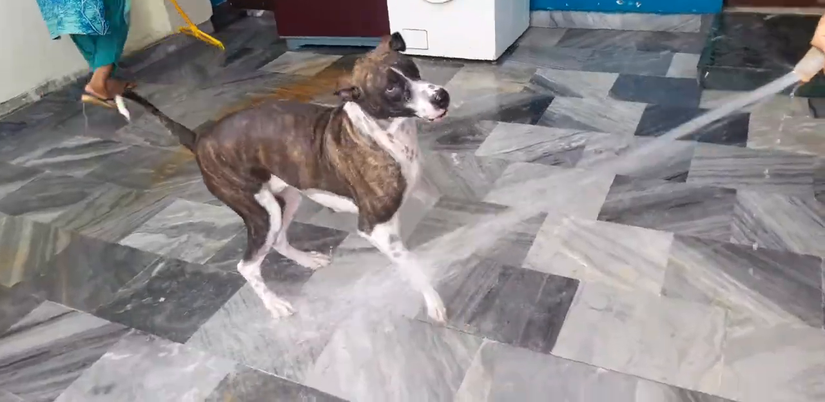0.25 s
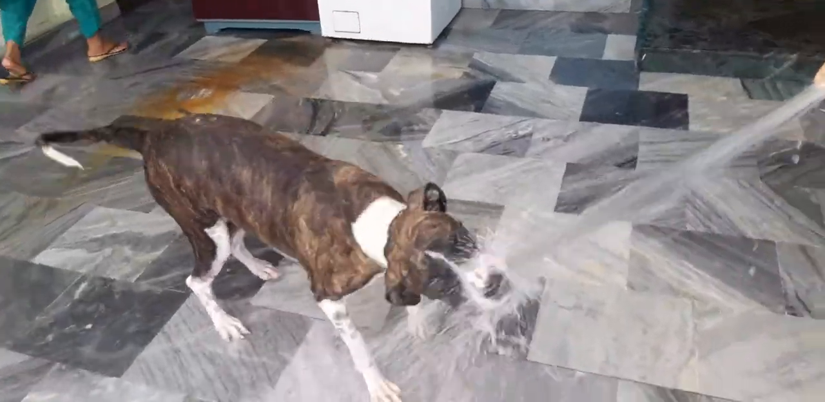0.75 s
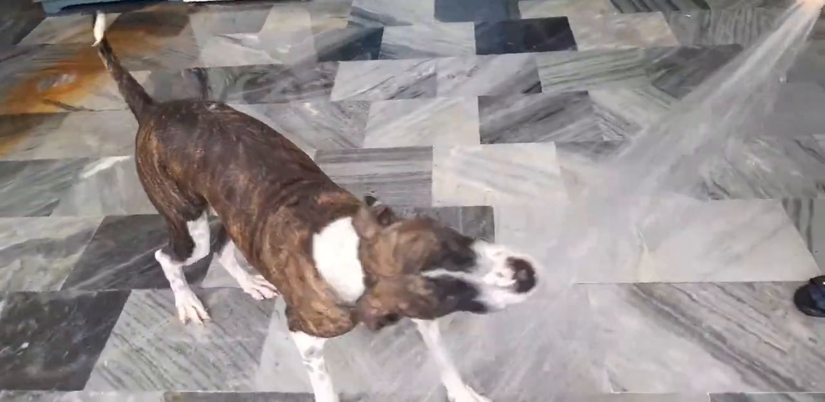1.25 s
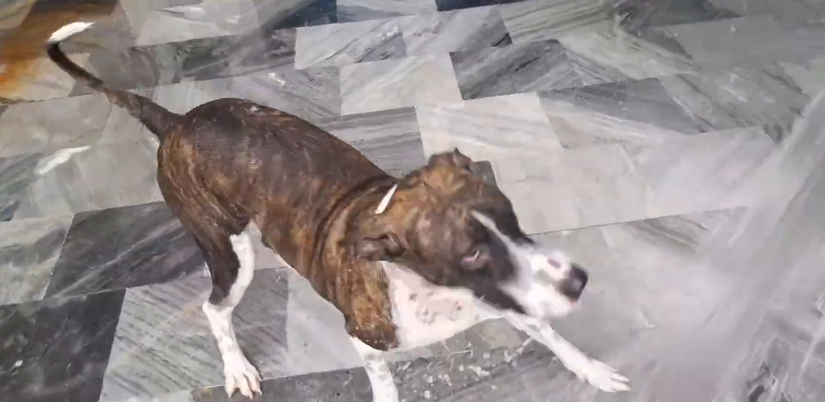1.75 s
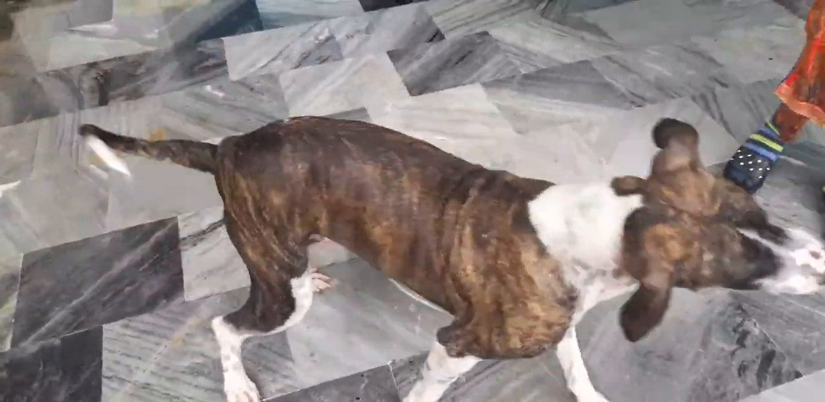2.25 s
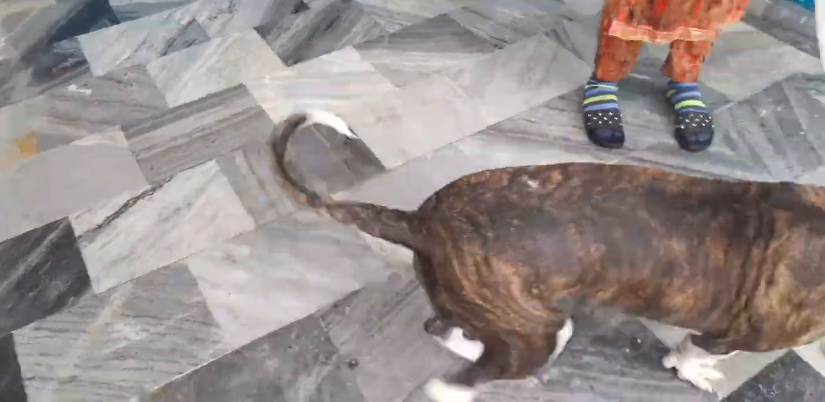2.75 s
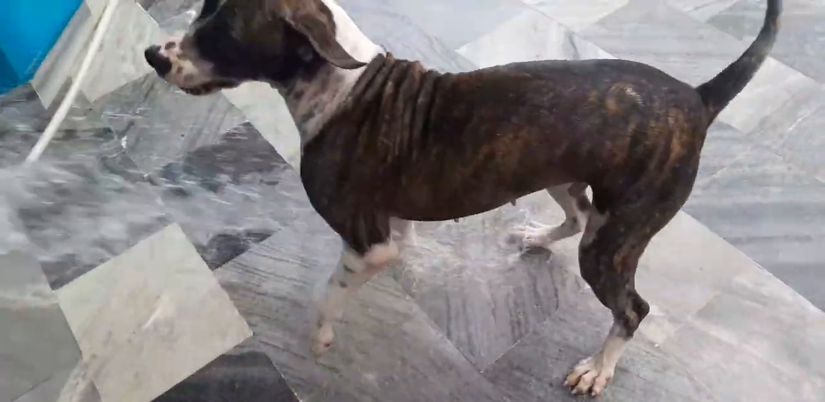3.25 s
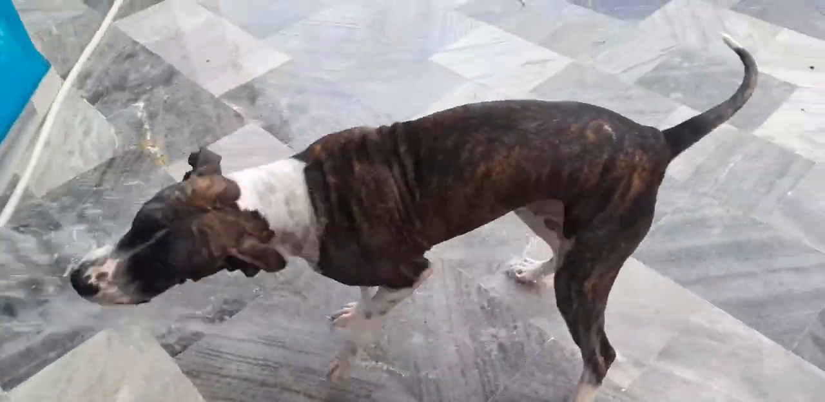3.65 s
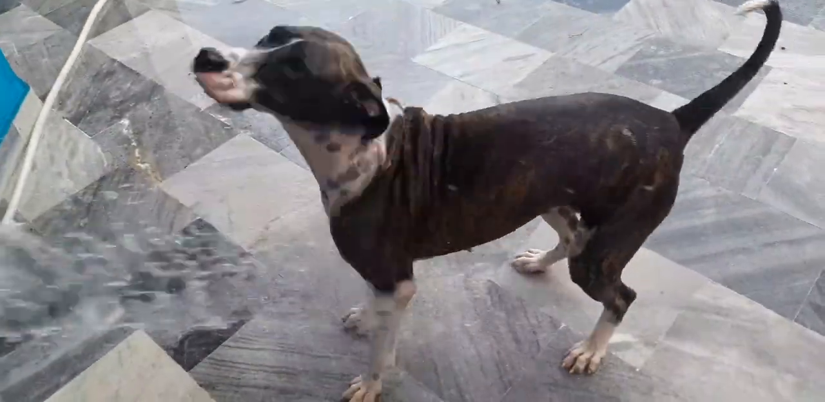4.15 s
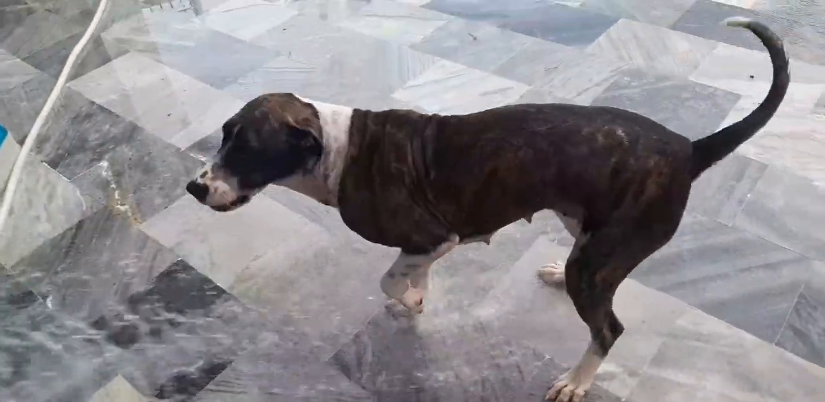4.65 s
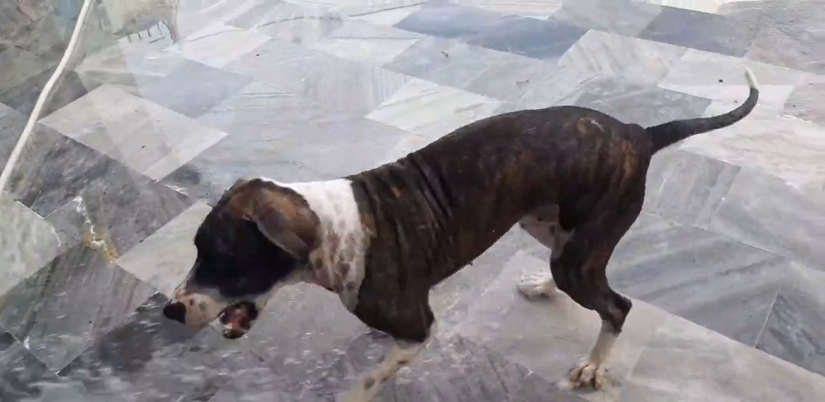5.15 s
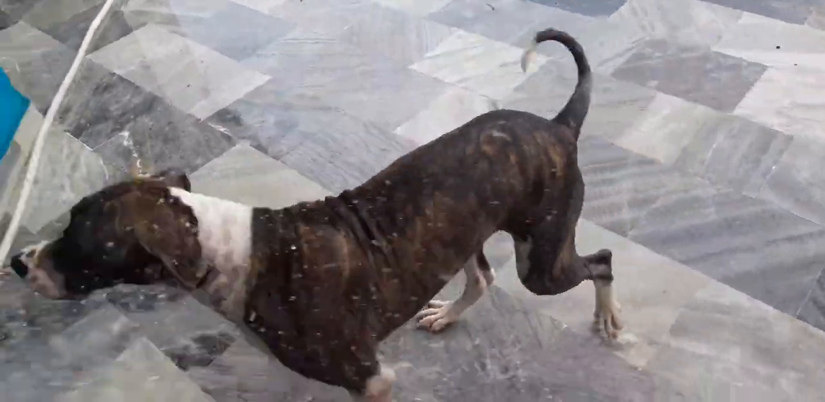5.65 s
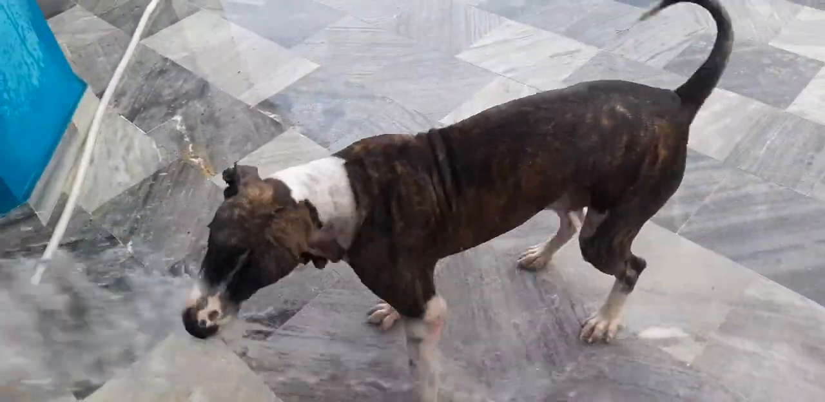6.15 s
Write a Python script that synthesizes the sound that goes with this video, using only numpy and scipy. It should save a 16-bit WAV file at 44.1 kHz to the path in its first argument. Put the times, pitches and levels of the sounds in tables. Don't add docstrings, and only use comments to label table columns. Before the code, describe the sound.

A hose jet patters and hisses densely on wet tiles while a dog splashes and snaps at the water, with one brief rubber squeak.

```python
import sys
import numpy as np
from scipy import signal
from scipy.fft import rfft, irfft, next_fast_len
from scipy.io import wavfile

SR = 44100
rng = np.random.default_rng(int(sys.argv[2]) if len(sys.argv) > 2 else 0)


def int16_out(signal):
    q = np.round(np.clip(np.atleast_2d(signal).T, -1, 1) * 32767)
    wavfile.write(sys.argv[1], SR, q.astype(np.int16))


def natural_amplitude(level_db):
    exponent = np.asarray(level_db, float) / 20
    return 10 ** exponent


N = 282769

# time in seconds, drop patter in dB, strength of the mist in dB.
JET = [(0.0, -30, -3), (0.12, -24.5, -4), (0.41, -21, -4.5), (0.8, -23, -4.5), (0.89, -30.5, -1.5),
       (1.02, -27.5, -5), (1.39, -27.5, -4.5), (1.48, -29, -4), (1.75, -28, -7), (2.0, -21.5, -8.5),
       (2.48, -22, -8.5), (2.59, -21.5, -6.5), (2.75, -24, -8), (3.1, -24.5, -7.5), (3.98, -25, -6.5),
       (5.39, -23, -7.5), (5.69, -25, -6), (6.41, -23.5, -7.5)]
# pitch in Hz, level in dB per Hz.
PATTER_COLOUR = [(530, -27), (900, -17), (1400, -17), (2180, -15), (3950, -7), (6220, -5), (8090, 1),
                 (8690, -0.5), (10300, -14), (11900, -6.5), (14000, -8.5), (15600, -10.5)]
ZONES_HZ = [1800, 3700, 7000, 12500]
# start in seconds, length in seconds, change of patter in dB,
# gain of heavy slaps in dB.
CROSSINGS = [(-.03, 0.16, 0.5, 3.5), (0.714, .12, 1, 7.5), (0.9, 0.066, -2, 3), (1.297, 0.18, 0.5, 4.5),
             (1.47, .07, -3, 5.5), (1.643, 0.086, -1, -1), (1.148, .1, -0.8, -2.5), (1.725, 0.038, 2.5, 1),
             (1.964, 0.12, -0.5, -1.5), (0.823, .07, -1, 3.5), (2.93, 0.088, -0.5, 4), (3.27, .08, 1.5, -1),
             (3.97, 0.072, 0.5, 3), (4.134, 0.11, -1.5, -2.5), (4.74, 0.28, 0.9, 0),
             (5.676, 0.076, -0.5, -1.5), (5.95, 0.56, 0.5, 2.5), (2.532, 0.11, 1, 7), (2.664, 0.14, 1, 9),
             (2.842, 0.071, 1, 9), (3.615, 0.28, 0.5, 5), (4.25, 0.15, 0.5, 3.5), (4.58, 0.053, 0.5, -4.5),
             (5.38, 0.22, 1, 7.5), (6.1, 0.073, 0, 5), (6.26, 0.047, -2.5, 9)]
# time in seconds, strength in dB,
# eddy size as a tilt toward the bass in dB per octave.
AIR = [(0, -42.5, 2), (.35, -39, 2.5), (.8, -41, -1), (1.05, -47, -1), (1.4, -44.5, -1), (1.75, -49, -3.5),
       (2.05, -37.5, 4), (2.35, -32, 3), (2.65, -35, -2), (3.25, -31.5, -1), (3.55, -33.5, 0.5),
       (4.0, -35, -1), (4.55, -34.5, 1.5), (4.85, -34, -1), (5.15, -34.5, 1), (5.8, -30, -0.5),
       (6.0, -31.5, -1.5), (6.41, -28, -0.5)]
# pitch in Hz, level in dB per Hz.
BUFFET_COLOUR = [(30, -70), (42, -46), (50, -34), (60, -14), (108, -4.5), (134, 0.5), (227, 1), (300, -1),
                 (400, -12.5), (520, -14), (880, -63)]
# pitch in Hz, level in dB per Hz.
RUSH_COLOUR = [(200, -27), (350, 5), (500, 0.5), (700, -3.5), (1000, -6.5), (1400, -14.5), (2500, -30)]
# time in seconds, turns per second in Hz.
ENGINE_TURNS = [(0, 19.0), (1.2, 19.3), (2.1, 19.3), (2.9, 19.0), (5.7, 19.0), (6.41, 18.5)]
# time in seconds, level in dB.
ENGINE_LEVEL = [(0, -51.5), (1.2, -62), (2.9, -45.5), (5.5, -45.5), (5.9, -44.5), (6.41, -40)]
# multiple of the turn rate, level in dB.
ENGINE_ORDERS = [(3, -17), (4, -11), (5, -10), (10, 0), (13, -5), (15, -3), (30, -11)]
# pitch in Hz, level in dB per Hz.
YARD_COLOUR = [(15, -58), (25, -37), (114, 3), (136, 5), (322, -31), (441, 1), (500, -36), (650, -46),
               (1100, -120)]
# time in seconds, level in dB, pitch in Hz, width in Hz.
PAWS = [(0.265, -30.5, 1650, 250), (0.272, -36, 1180, 200), (0.31, -33, 1500, 600),
        (0.891, -39.5, 613, 500), (1.723, -40, 800, 800), (6.288, -24.5, 560, 400), (6.304, -28, 990, 250)]
# time in seconds, peak in dB, pitch in Hz, width as a share of the pitch,
# thrown water in dB.
SNAPS = [(0.6923, -2, 11500, .8, -28), (1.578, -8.5, 7750, 0.35, -35), (1.928, -14, 4960, .8, -39),
         (1.864, -18.5, 2380, 0.53, -32), (2.529, -22.5, 950, .9, -32.5), (3.121, -14, 4000, 1.1, -27),
         (3.408, -30, 1070, .8, -40), (3.7895, -14, 1800, 1.3, -38), (3.9566, -16, 910, .95, -36),
         (4.218, -55, 900, .9, -55), (5.523, -18, 2200, 1.1, -38), (5.539, -26, 2500, 1.05, -33),
         (5.555, -18, 2200, 1.1, -37), (5.877, -26, 696, .8, -42), (6.2873, -17, 750, 1.1, -27)]
# time in seconds, eight times the slip rate in Hz.
SQUEAK_GLIDE = [(0.51, 3400), (0.6, 3425), (0.665, 3410), (0.775, 3465)]
# multiple of the slip rate, level in dB.
SQUEAK_ORDERS = [(6, -20), (7, -12), (8, 0), (9, -13), (10, -20)]
# time in seconds, level in dB.
GRIPS = [(.543, -28), (.567, -28), (.6, -24), (.632, -24), (.652, -31), (.675, -35), (.702, -34),
         (.723, -32), (.748, -38)]
# start in seconds, length in seconds, level in dB, pitch in Hz,
# width in Hz.
SPLASHES = [(0.59, 0.035, -26.5, 3500, 2000), (0.715, 0.065, -40, 1300, 1800),
            (2.533, 0.064, -36, 1400, 1500), (2.838, 0.098, -32, 2000, 2300),
            (5.384, 0.23, -46, 2700, 3200), (5.39, .1, -32, 5300, 770), (2.855, 0.096, -35, 320, 260),
            (5.49, 0.086, -34, 470, 190), (5.76, 0.16, -35, 520, 330), (9.1, 0.071, -37.5, 490, 490),
            (4.84, .06, -42, 540, 400), (0.78, .14, -44.5, 670, 630), (5.3, 0.19, -42, 550, 350),
            (1.3, 0.23, -49, 700, 600), (1.7, 0.039, -39, 510, 440), (3.13, 0.16, -34.5, 410, 240),
            (6.118, .07, -46, 2300, 1400)]
# time in seconds, low edge in Hz, high edge in Hz, level in dB.
PARTINGS = [(1.237, 5200, 7000, -41), (1.449, 4180, 5800, -44), (3.097, 5760, 7650, -39),
            (3.398, 4600, 6300, -40), (3.398, 10200, 11800, -48), (4.257, 11000, 12500, -42),
            (4.56, 8100, 11100, -39), (4.56, 12400, 13800, -47), (4.93, 7600, 8950, -33),
            (4.93, 4200, 5200, -43), (5.025, 11700, 13100, -41), (5.815, 8150, 11000, -36),
            (5.815, 11700, 13100, -43), (6.305, 8200, 9600, -37)]


def rms_one(x):
    return x / np.sqrt(np.mean(x ** 2) + 1e-20)


def in_time(rows):
    s, *columns = np.transpose(rows)
    return [np.interp(np.arange(N) / SR, s, c) for c in columns]


def drift(rate_hz):
    r = np.exp(-80 * np.pi * rate_hz / SR)
    noise = rng.standard_normal(N // 40 + 2002)
    slow = signal.lfilter([1], [1, -2 * r, r * r], noise)[2000:]
    return np.interp(np.arange(N) / 40, np.arange(len(slow)), rms_one(slow))


def bands(x, colour, count):
    size = next_fast_len(N)
    pitch = np.log(np.arange(size // 2 + 1) * SR / size + 1)
    hz, db = np.transpose(colour)
    hz = np.log(hz)
    tone = rfft(x, size) * natural_amplitude(np.interp(pitch, hz, db))
    tone /= np.sqrt(np.mean(irfft(tone, size) ** 2))
    centres = np.linspace(hz[0], hz[-1], count)
    for k, centre in enumerate(centres):
        share = np.interp(pitch, centres, np.arange(count) == k)
        yield np.exp(centre), irfft(tone * share, size)[:N]


def resonance(x, hz, width_hz):
    r = np.exp(-np.pi * width_hz / SR)
    ring = [1, -2 * r * np.cos(2 * np.pi * hz / SR), r * r]
    return signal.lfilter([(1 - r * r) / 2, 0, (r * r - 1) / 2], ring, x)


def drops(per_s, spread_db, clump_db):
    sizes = natural_amplitude(spread_db * np.minimum(rng.exponential(1, N), 4)) * rng.choice([-1, 1], N)
    landed = rng.random(N) < per_s * natural_amplitude(clump_db * drift(60)) / SR
    return rms_one(sizes * landed)


def crossings():
    enter_s, leave_s = 0.035, 0.081
    t = np.arange(N) / SR
    s, length, patter_db, slap_db = np.transpose(CROSSINGS)[..., None]
    inside = np.clip(np.minimum((t - s) / enter_s, (s + length - t) / leave_s) + .5, 0, 1)
    return np.sum(inside * patter_db, axis=0), np.sum(inside * slap_db, axis=0)


def spray():
    heavy_follow, broad_follow = 0.58, 0.74
    broad_share, mist_share = 0.38, 0.23
    patter_db, mist_db = in_time(JET)
    change_db, slap_db = crossings()
    swing = patter_db - patter_db.mean()
    heavy = (heavy_follow - 1) * swing + slap_db - 2.0
    broad = (broad_follow - 1) * swing + broad_share * slap_db - .9
    mist = mist_db - mist_db.mean() + mist_share * change_db
    zones = [heavy, broad, 0 * swing, mist]

    impacts = 0.63 * drops(per_s=9000.0, spread_db=4.0, clump_db=1.96) + 0.67 * rng.standard_normal(N)
    surge = 0.31 * drift(1) + 0.28 * drift(45)
    out = 0
    for hz, band in bands(impacts, PATTER_COLOUR, count=18):
        shares = [np.interp(np.log(hz), np.log(ZONES_HZ), row) for row in np.eye(4)]
        zone_db = sum(share * zone for share, zone in zip(shares, zones))
        out = out + band * natural_amplitude(zone_db + surge + 0.71 * drift(4.7))
    return out * natural_amplitude(patter_db + change_db + 2.05)


def air():
    pivot_hz, rush_db, rush_follows = 221, -40.5, 1.13
    air_db, size = in_time(AIR)
    lumps = np.tanh(drift(3.6))
    lows = 0
    for hz, band in bands(rng.standard_normal(N), BUFFET_COLOUR, count=6):
        tilt_db = size * np.log2(pivot_hz / np.clip(hz, 60, 500))
        lows = lows + band * natural_amplitude(0.9 * lumps + .3 * drift(8) + tilt_db)
    gurgle = .45 * drops(per_s=1500.0, spread_db=2.0, clump_db=1.5) + 0.85 * rng.standard_normal(N)
    rush = sum(band * natural_amplitude(.4 * lumps + 0.6 * drift(10)) for hz, band in bands(gurgle, RUSH_COLOUR, count=6))
    swing = air_db - air_db.mean()
    return lows * natural_amplitude(air_db - 3.5) + rush * natural_amplitude(rush_db + rush_follows * swing - 1.26 * size)


def engine():
    (hz,), (level_db,) = in_time(ENGINE_TURNS), in_time(ENGINE_LEVEL)
    swing = level_db - level_db.mean()
    load_db = np.interp(np.arange(N) / SR, [5.3, 6.7], [0, 13.5])
    low_db = -49.5 + 0.51 * swing + load_db
    high_db = -50 + 1.2 * swing
    turn = 2 * np.pi * np.cumsum(hz * (1 + .004 * drift(3))) / SR
    orders = sum(natural_amplitude(db + 2.7 * drift(2.7)) * np.sin(k * turn + k * k) for k, db in ENGINE_ORDERS)
    low = np.sin(7.5 * turn) * natural_amplitude(low_db + 1.9 * drift(1.3))
    high = np.sin(12 * turn) * natural_amplitude(high_db + 1.6 * drift(6))
    return np.sqrt(2) * (orders * natural_amplitude(level_db) + low + high)


def yard():
    return natural_amplitude(-54) * sum(band for hz, band in bands(rng.standard_normal(N), YARD_COLOUR, count=2))


def water_hits(hits):
    out, t = np.zeros(N + SR), np.arange(SR // 3) / SR
    for s, peak_db, hz, width_hz, wet_db, t60_s in hits:
        width_hz = max(width_hz, 100)
        click = resonance(1. * (t == 0), hz, 0.91 * width_hz)
        click = resonance(click, hz, 0.91 * width_hz)
        thrown = rms_one(resonance(rng.standard_normal(len(t)), hz, width_hz))
        tail = thrown * natural_amplitude(wet_db - 60 * t / max(t60_s, .01))
        at = round(s * SR)
        out[at:at + len(t)] += tail + natural_amplitude(peak_db) * click / click.max()
    return out[:N]


def paws():
    return water_hits([(s, db, hz, width_hz, db, 0.2) for s, db, hz, width_hz in PAWS])


def squeak():
    slide_db, grip_fall_db_per_s = -41, 750
    hz, = in_time(SQUEAK_GLIDE)
    t = np.arange(N) / SR
    bites_db = [np.maximum(db - grip_fall_db_per_s * abs(t - s), slide_db) for s, db in GRIPS]
    level_db = np.max(bites_db, axis=0)
    phase = 2 * np.pi * np.cumsum(hz / 8 * (1 + 0.004 * drift(30))) / SR
    tone = sum(natural_amplitude(db + 2.8 * drift(35)) * np.sin(k * phase + k * k) for k, db in SQUEAK_ORDERS)
    start_s, end_s = SQUEAK_GLIDE[0][0], SQUEAK_GLIDE[-1][0]
    grip = np.clip(np.minimum(t - start_s, end_s - t) / 0.027, 0, 1)
    return np.sqrt(2) * tone * grip * natural_amplitude(level_db + 2.2 * drift(110))


def splashes():
    t, out = np.arange(N) / SR, 0
    crackle = drops(per_s=2200.0, spread_db=3.0, clump_db=2.0)
    for s, length, level_db, hz, width_hz in SPLASHES:
        gate = np.clip(np.minimum((t - s) / .004, (s + length - t) / (0.26 * length) + .5), 0, 1)
        wide_hz = 1.65 * max(width_hz, 100)
        burst = gate * resonance(resonance(crackle, hz, wide_hz), hz, wide_hz)
        out = out + natural_amplitude(level_db) * rms_one(burst) * np.sqrt(length * SR / N)
    return out


def snaps():
    return water_hits([(s, db, hz, share * hz, wet_db, 170 / hz) for s, db, hz, share, wet_db in SNAPS])


def partings():
    out, t = np.zeros(N), np.arange(-1024, 1024)
    window = np.hanning(len(t))
    for s, low_hz, high_hz, level_db in PARTINGS:
        band_filter = signal.butter(8, [low_hz, high_hz], "band", fs=SR, output="sos")
        band = signal.sosfiltfilt(band_filter, rng.standard_normal(len(t)))
        middle = 185 + 1024 * round((s * SR - 185) / 1024)
        out[middle + t] += natural_amplitude(level_db + 6.0) * window * rms_one(band)
    return out


def scene():
    mono = spray() + air() + engine() + yard() + paws() + squeak() + splashes() + snaps()
    return np.stack([mono, mono])


def band_limit(x):
    return signal.sosfilt(signal.butter(12, 17090, fs=SR, output="sos"), x)


def record(dry):
    top_cut = signal.ellip(10, .3, 70, 15740, fs=SR, output="sos")
    bass_cut = signal.butter(2, 42, "high", fs=SR, output="sos")
    heard = signal.sosfilt(bass_cut, signal.sosfilt(top_cut, dry))
    return band_limit(heard + partings() * [[1], [-1]])


dry = scene()
out = record(dry)
int16_out(out)
```